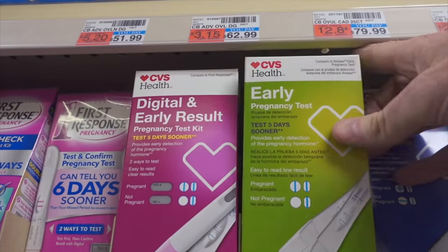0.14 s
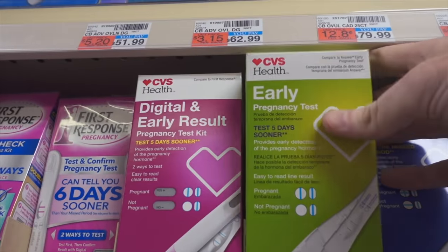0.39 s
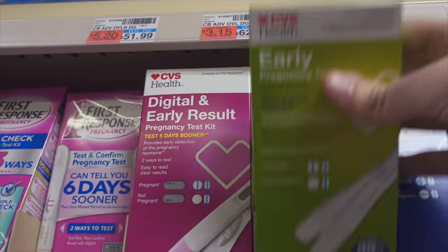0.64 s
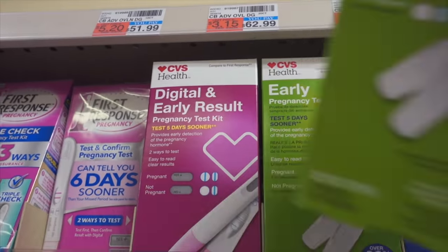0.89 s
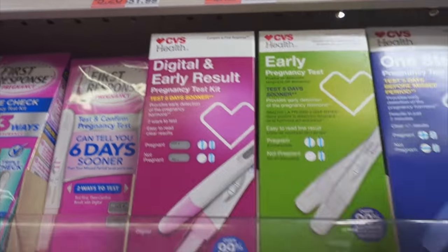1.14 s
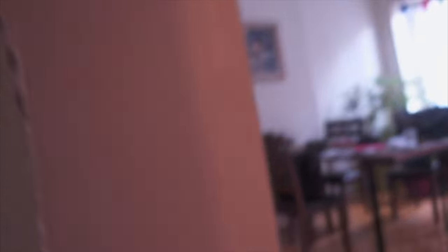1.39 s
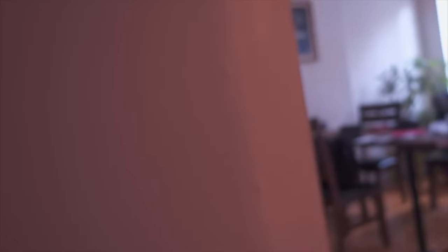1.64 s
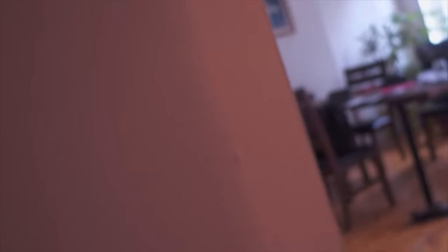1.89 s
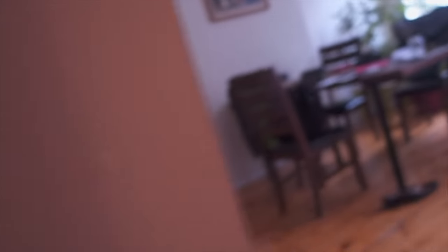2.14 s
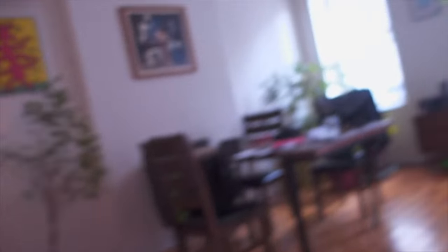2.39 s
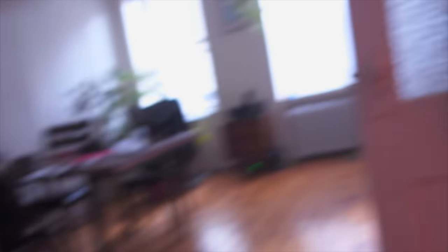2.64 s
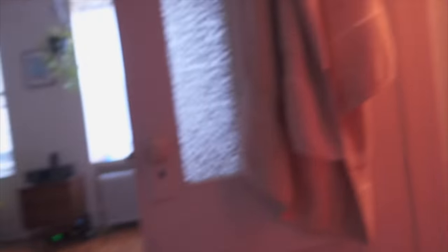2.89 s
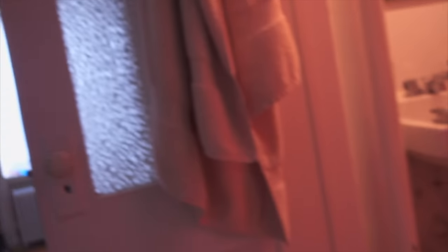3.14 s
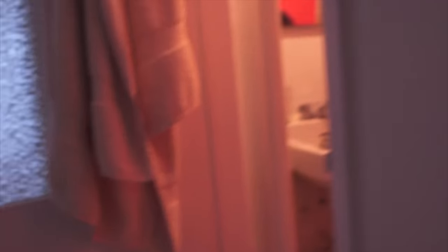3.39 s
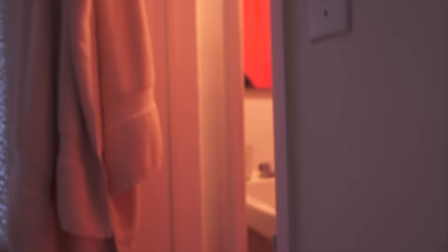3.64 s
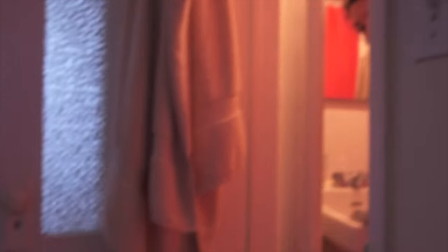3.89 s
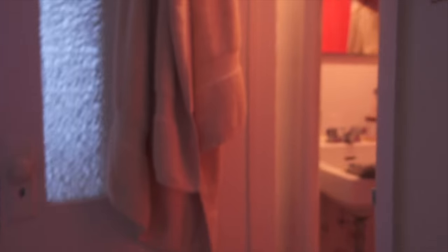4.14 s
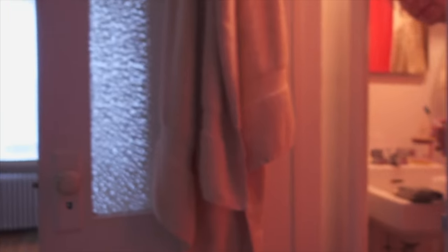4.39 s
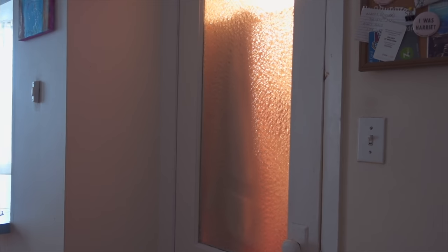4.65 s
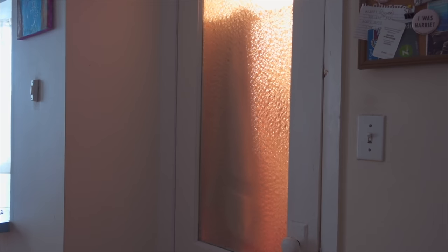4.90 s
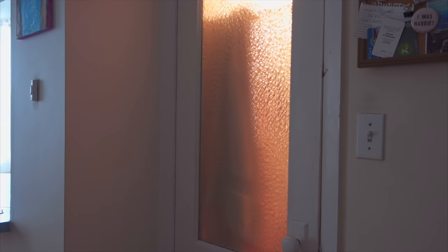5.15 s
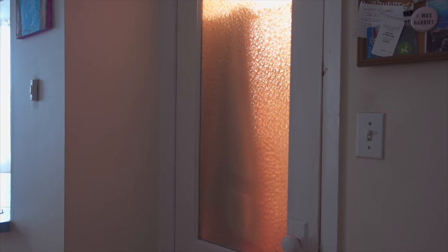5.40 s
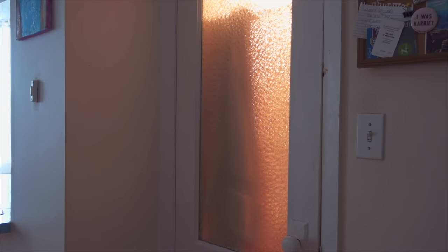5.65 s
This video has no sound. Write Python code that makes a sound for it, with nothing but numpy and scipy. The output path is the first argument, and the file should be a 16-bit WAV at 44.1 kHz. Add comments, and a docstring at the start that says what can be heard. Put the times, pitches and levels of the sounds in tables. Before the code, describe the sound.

In a shop with a low hum, a light cardboard box scrapes along a shelf and knocks hollowly against its neighbours. An abrupt cut to a quiet home: clothes rustle close to the microphone, footfalls thump on wooden boards, small metal parts tick. A latch clacks and jingles, a door thuds shut and shudders in its frame. Finally water hisses steadily through pipes behind the closed door.

```python
"""Three shots, in order of time. In a humming shop a cardboard box is slid off a shelf and knocks its neighbours:
stick-slip noise and struck modes of its panels and the air inside. At home someone walks over a wooden floor:
damped thumps shake the boards, clothes rustle as grainy noise, small metal parts tick. A door latch clacks and
jingles, the door thuds shut and shudders. Behind the closed door water hisses steadily through the pipes,
as smooth and narrow-band noise, with a few faint thumps."""
import sys
import numpy as np
from scipy import signal
from scipy.fft import rfft, irfft, next_fast_len
from scipy.io import wavfile

SR = 44100
rng = np.random.default_rng(int(sys.argv[2]) if len(sys.argv) > 2 else 0)


def bounce(signal):
    """Save signal as a 16-bit WAV file at the path given by the first command-line argument."""
    frames = np.transpose(np.atleast_2d(signal))
    limited = np.clip(frames, -1, 1)
    pcm = np.round(limited * 32767).astype(np.int16)
    wavfile.write(sys.argv[1], SR, pcm)


def attenuation_scalar(level_db):
    """Turn a level in dB into a linear amplitude multiplier (20 dB per decade)."""
    decades = np.asarray(level_db, float) / 20
    return 10 ** decades


N = 254060
T = np.arange(N) / SR
# row gains that tilt a level_db left-right difference evenly
TILT = [.5, -.5]


def rms_one(x):
    """Scales to unit power."""
    return x / np.sqrt(np.mean(x ** 2) + 1e-20)


def at_hz(points, hz):
    """Reads a table on a log-frequency axis."""
    points = np.array(points)
    return np.interp(np.log(hz), np.log(points[:, 0]), points[:, 1])


# Left-right likeness of diffuse sound: pitch_hz, correlation [-1..1]
LIKENESS = [(60, .97), (150, .975), (380, 0.96), (950, 0.86), (2380, 0.63), (5980, -0.15), (15000, -0.2)]


def noise(spectrum=((20, 0), (20000, 0))):
    """Shaped stereo noise of unit power, alike in the bass and nearly unrelated in the treble."""
    size = next_fast_len(N)
    hz = np.arange(1, size // 2 + 2) * SR / size
    mid, side = rfft(rng.standard_normal((2, size)))
    alike = np.clip(at_hz(LIKENESS, hz), -.99, .99)
    pair = np.sqrt(1 + alike) * mid + np.sqrt(1 - alike) * side * [[1], [-1]]
    return rms_one(irfft(pair * attenuation_scalar(at_hz(spectrum, hz)), size)[:, :N])


def grain(per_s, depth_db):
    """Level that jumps about in short lumps; unit power."""
    knots = rng.exponential(1, int(N / SR * 4000))
    lumps = np.interp(T * per_s, np.arange(len(knots)), knots)
    return rms_one(attenuation_scalar(depth_db * np.minimum(lumps, 3)))


def resonate(x, modes):
    """Parallel resonances (pitch_hz, width_hz, level_db) with alternating signs."""
    out = 0
    for k, (hz, width_hz, db) in enumerate(modes):
        r = np.exp(-np.pi * width_hz / SR)
        poles = [1, -2 * r * np.cos(2 * np.pi * hz / SR), r * r]
        out = out + (-1) ** k * attenuation_scalar(db) * signal.lfilter([1 - r * r, 0, r * r - 1], poles, x)
    return out


def shaken(envelope, modes):
    """Noise under an envelope drives a body; the body leaves the power unchanged."""
    impulse = resonate(signal.unit_impulse(8192), modes)
    return resonate(envelope * noise(), modes) / np.sqrt(np.sum(impulse ** 2))


def bursts(times_s, db, t60_s):
    """Envelope of contacts that start at once and die away."""
    out = np.full(N, 1e-9)
    for s, gain, ring_s in zip(times_s, attenuation_scalar(db), np.broadcast_to(t60_s, np.shape(times_s))):
        i = int(s * SR)
        age = T[:min(SR // 2, N - i)]
        out[i:i + len(age)] += gain * attenuation_scalar(-60 * age / ring_s)
    return out


def struck(times_s, db, pitch_hz, t60_s, rise_s):
    """Damped sines, one row per contact; a soft contact makes them swell briefly."""
    out = np.zeros((len(times_s), N))
    age = T[:SR // 2]
    for row, s, gain, hz, ring_s in zip(out, times_s, attenuation_scalar(db), pitch_hz, t60_s):
        i = int(s * SR)
        envelope = gain * attenuation_scalar(-60 * age / ring_s) * (1 - np.exp(-age / rise_s))
        ring = envelope * np.sin(2 * np.pi * hz * age)
        row[i:][:len(age)] = ring[:N - i]
    return out


def swells(rows):
    """Strokes swell and fade at steady dB rates: summed power as gain, last column averaged by power as gain."""
    power = weighted = 1e-12
    for s, db, swell_s, fade_s, other_db in rows:
        fall = np.maximum((s - T) / swell_s, (T - s) / fade_s)
        stroke = attenuation_scalar(2 * (db - 10 * fall))
        power = power + stroke
        weighted = weighted + stroke * attenuation_scalar(2 * other_db)
    return np.sqrt(power), np.sqrt(weighted / power)


def tones(lines, waver_db):
    """Steady tones (pitch_hz, rms level_db) whose strength wavers."""
    return sum(np.sqrt(2) * attenuation_scalar(db) * grain(14, waver_db) * np.sin(2 * np.pi * hz * T) for hz, db in lines)


def room(x, t60_s, wet_db):
    """Adds a diffuse tail; walls and air swallow the treble sooner."""
    age = T[:SR // 2]
    bass = signal.lfilter([.3], [1, -.7], noise()[:, :len(age)])
    bass = signal.lfilter([.5], [1, -.5], bass)
    full = .4 * noise()[:, :len(age)]
    tail = bass * attenuation_scalar(-60 * age / t60_s) + full * attenuation_scalar(-60 * age / (.55 * t60_s))
    tail = tail * (age > .004) / np.sqrt(np.sum(tail ** 2) / 2)
    source = x.mean(axis=0, keepdims=True)
    return x + attenuation_scalar(wet_db) * signal.fftconvolve(source, tail, axes=1)[:, :N]


# Shop hum: pitch_hz, level_db (rms)
SHOP_HUM = [(86, -50), (118.4, -45.5)]
# Shop air spectrum: pitch_hz, density_db_per_hz
SHOP_AIR = [(18, -45.5), (30, -27.5), (106, 4), (179, -11), (554, -12.5), (844, -33), (1010, -23),
            (1630, -22), (1760, -16.5), (4530, -41.5), (16000, -44.5)]


def shop_air():
    """Wavering hum tones over shaped noise."""
    return tones(SHOP_HUM, 2.5) + attenuation_scalar(-46) * noise(SHOP_AIR)


# Home air spectrum: pitch_hz, density_db_per_hz
HOME_AIR = [(50, -45), (85, -4.5), (126, 1), (141, -2.5), (468, -25), (569, -7.5), (1050, -21),
            (1590, -15.5), (1740, -7.5), (2460, -27.5), (8200, -37.5), (14500, -35.5), (15800, -31)]
# Mains tone: pitch_hz, level_db (rms)
MAINS = [(59.2, -68)]


def home_air():
    """Faint shaped noise, stronger at left, and a mains tone."""
    return attenuation_scalar(-63) * attenuation_scalar([[1.5], [-1.5]]) * noise(HOME_AIR) + tones(MAINS, .3)


# Pipe hiss spectrum: pitch_hz, density_db_per_hz
HISS = [(24, -63), (40, -34), (185, -11), (256, -24), (422, -15), (733, -11), (965, 1), (1680, -17.5),
        (2150, -11.5), (2630, -24), (2980, -12.5), (7170, -20), (8130, -9), (10200, -27), (16000, -33.5)]
# Pipe resonances: pitch_hz, width_hz, level_db
PIPES = [(178, 54, -15.5), (568.5, 5.1, 5.5), (729, 26, 4), (947, 20, -12), (1454, 23, -4.5),
         (1960, 32, -5.5), (2170, 94, -12.5), (2770, 420, -13.5), (3540, 29, -9), (4140, 115, -11.5),
         (4820, 47, -7.5), (5340, 123, -14), (6090, 130, -12), (6800, 160, -14), (8030, 350, -10.5)]
# Faint whistles in the flow: pitch_hz, width_hz, level_db
WHISTLES = [(508.5, 11, -4.5), (853, 12, -6), (1076, 12, -2), (1136, 10, -0.5), (1190, 12, 3),
            (1310, 12, -6), (2480, 14, -4), (2850, 14, -3.5)]


def pipes():
    """Smooth hiss plus noise held in many narrow resonances."""
    hiss = attenuation_scalar(-41.5) * noise(HISS)
    resonances = attenuation_scalar(-43) * shaken(0.85, PIPES)
    whistles = attenuation_scalar(-51) * shaken(0.93, WHISTLES)
    return hiss + resonances + whistles


# Clothes swishes: peak_s, level_db, swell_s (per 10 dB), fade_s (per 10 dB), heavy_folds_re_weave_db
SWISHES = [(1.328, -32, .035, .08, -8), (1.468, -25, .12, .011, -7), (1.515, -39, .03, .03, -2),
           (1.65, -36, .2, .025, -7), (1.72, -43, .08, .15, -11), (1.94, -51, .03, .05, -6),
           (2.09, -39, .11, .1, -14), (2.2, -33, .12, .12, -8), (2.33, -45, .04, .03, -8),
           (2.404, -47, .025, .1, -2), (2.46, -47, .03, .1, 2), (2.54, -49, .1, .01, 0),
           (2.634, -44, .1, .07, -28), (2.7, -50, .02, .22, -2), (2.955, -62, .02, .1, 4),
           (3.116, -62, .08, .05, 10), (3.16, -61, .3, .02, -2), (3.5, -76, .04, .02, 12),
           (4.11, -66, .06, .02, 14)]
# Fine weave spectrum: pitch_hz, density_db_per_hz
WEAVE = [(1470, -35), (2500, -2), (4420, 1.5), (8040, -2.5), (9310, -1), (11300, 0.5), (14900, 6),
         (15700, -10)]
# Floor board modes: pitch_hz, width_hz, level_db
BOARDS = [(102, 25, 1.5), (138, 33, -0.5), (215, 30, 2.5), (309, 60, -1), (406, 88, -2), (523, 170, -5),
          (623, 70, -3.5), (761, 150, -14.5)]
CRACKLES_PER_S, CRACKLE_RE_WEAVE_DB = 25.0, 1.5
# board rumble when the clothes are at -40 dB; share of their dB swing it follows
FLOOR_DB, FLOOR_FOLLOWS = -52, .6


def clothes():
    """Cloth swishes in fine grains, lone fibres and seams snap, boards rumble under the moving body."""
    weave, heavy = swells(SWISHES)
    rumble = attenuation_scalar(FLOOR_DB) * (weave / attenuation_scalar(-40)) ** FLOOR_FOLLOWS
    snap_gain = attenuation_scalar(CRACKLE_RE_WEAVE_DB + 4.0 * np.minimum(rng.exponential(1, N), 3))
    snaps = (rng.random(N) < CRACKLES_PER_S / SR) * snap_gain
    snaps = signal.lfilter([1], [1, -attenuation_scalar(-60 / (.008 * SR))], snaps + 1e-18)   # 8 ms t60
    fine = weave * (grain(760, 2.8) + snaps) * noise(WEAVE)
    folds = shaken(weave * heavy * grain(400, 2.2), [(750, 500, -2), (1600, 900, 0), (2600, 900, -10)])
    return fine + folds + shaken(rumble, BOARDS)


# Footfalls: start_s, level_db, thump_hz, thump_t60_s, boards_re_level_db
STEPS = [(1.372, -8, 294, 0.046, -9), (1.384, -1.5, 247, 0.033, -14), (1.397, -12, 212, 0.034, -7.5),
         (1.421, -30, 228, 0.05, 0.5), (1.434, -23, 129, 0.033, -7), (1.398, -20, 105, .08, -14),
         (1.33, -36, 125, .12, -12), (1.625, -31, 140, 0.12, -20), (1.739, -37.5, 87.7, 0.13, -14),
         (1.77, -41, 185, 0.12, -16), (1.964, -20.5, 191, 0.19, -15.5), (2.056, -15, 166, 0.065, -23),
         (2.084, -23, 150, 0.07, -19), (2.12, -35, 190, .25, -5), (2.209, -30, 99, 0.073, -12),
         (2.7, -11.5, 222, 0.065, -14), (2.728, -32, 196, 0.082, -3), (2.76, -33, 223, 0.1, -3),
         (2.81, -41, 175, 0.08, -4), (3.1, -45, 195, 0.08, -5), (4.78, -39, 182.5, 0.2, -8),
         (4.849, -39.5, 163, 0.11, -10), (4.95, -40.5, 191, 0.13, -15)]
# deeper thumps wake the two heavy boards more; at HEAVY_HZ as much as the light ones
HEAVY_HZ, HEAVY_DB_PER_OCTAVE = 140, -26


def footfalls():
    """Each footfall is a damped thump that shakes the boards, with a short slap."""
    s, level_db, pitch_hz, t60_s, boards_db = np.transpose(STEPS)
    boards_db = level_db + boards_db
    thump = struck(s, level_db, pitch_hz, t60_s, 0.0025).sum(axis=0)
    heavy_db = HEAVY_DB_PER_OCTAVE * np.maximum(np.log2(pitch_hz / HEAVY_HZ), -.1)
    boards = shaken(bursts(s, boards_db + heavy_db, 1.4 * t60_s), BOARDS[:2])
    boards += shaken(bursts(s, boards_db, 1.28 * t60_s), BOARDS[2:])
    slap = shaken(bursts(s, boards_db - 15, 0.06), [(1000, 600, 0), (1700, 700, 0)])
    return thump + boards + slap


# Dry ticks of small hard parts: start_s, level_db, centre_hz, snap_re_level_db, left_right_db
TICKS = [(1.4508, -9, 2170, -13, 10), (1.4714, -19, 2020, -11, 8), (1.5242, -15.5, 4230, -4.5, 0.0),
         (1.737, -23, 2250, -5.5, -1), (1.8023, -29.5, 2150, -4, 10), (2.173, -27, 1850, -6, 20),
         (2.4077, -16.5, 5600, -16.5, 13), (2.4538, -25, 1670, -14.5, 14), (2.5064, -17.5, 5260, -12.5, -2),
         (2.615, -3.5, 4740, -16.5, 5.5), (2.978, -37.5, 1940, -6, -3), (3.1009, -35, 1540, -17.5, 12),
         (3.506, -39, 2070, -27, 18), (3.6416, -4, 2500, -20, 10.0), (4.6563, -24, 1800, -21, -5)]


def ticks():
    """A few cycles at the centre pitch plus a bright snap."""
    s, level_db, centre_hz, snap_db, pan_db = np.transpose(TICKS)
    snaps = np.stack([bursts(s, level_db + snap_db + side * pan_db, 0.013) for side in TILT])
    bright = shaken(snaps, [(5100, 4400, -2), (9000, 7400, 0), (14500, 2000, -0.28)])
    cycles = struck(s, level_db - 5, centre_hz, np.full(len(s), .005), 0.00028)
    return bright + attenuation_scalar(np.outer(TILT, pan_db)) @ cycles


# Metal parts set ringing: start_s, pitch_hz, level_db, t60_s, left_right_db
RINGS = [(1.452, 7600, -31, .05, 0), (1.526, 7540, -29, 0.05, 5), (1.737, 12070, -35, 0.12, -4),
         (2.407, 5830, -32, 0.036, -1), (2.615, 7620, -29, 0.06, 10), (2.615, 11550, -31, 0.05, 6),
         (2.615, 5900, -14, 0.007, 4.5), (2.615, 3650, -18, 0.007, 13), (3.828, 14130, -20, .09, -2),
         (3.828, 10720, -32, .09, 0), (3.828, 12110, -33, .09, 0), (3.828, 7510, -39, 0.097, 0),
         (4.266, 10770, -24, .06, 0), (4.46, 4020, -30.5, 0.038, 0)]


def rings():
    """Damped high sines with a fluttering level."""
    s, ring_hz, ring_db, t60_s, pan_db = np.transpose(RINGS)
    flutter = grain(350, 2.5)
    return attenuation_scalar(np.outer(TILT, pan_db)) @ struck(s, ring_db, ring_hz, t60_s, 0.00048) * flutter


# Latch contacts: start_s, level_db, clack_hz, jingle_re_rattle_db
LATCH = [(3.556, -21, 1310, -8.5), (3.599, -28, 1190, 1.5), (3.675, -17.5, 2360, -3),
         (3.697, -22, 1770, -16), (3.724, -27.5, 1040, -13), (3.749, -30, 1260, -6.5),
         (3.825, -20, 1710, -10), (4.129, -19, 1470, -20), (4.135, -24.5, 1120, -18), (4.191, -26, 929, -1),
         (4.264, -22, 2010, 3.5), (4.277, -18, 2130, -23), (4.304, -20.5, 947, -18),
         (4.33, -20.5, 1390, -25), (4.433, -21.5, 700, -22), (4.459, -30, 603, -5)]
# Lock body modes: pitch_hz, width_hz, level_db
LOCK = [(861, 90, -20), (1194, 600, 6), (1376, 180, -12), (1700, 200, 3), (1986, 240, 5), (2200, 350, 4.5)]
# Loose metal modes: pitch_hz, width_hz, level_db
JINGLE = [(3630, 1570, 9.5), (7440, 830, 2.5), (10300, 1900, 4), (13900, 940, 1.5), (16000, 1700, -3.5)]


def latch(again_s, again_db):
    """Contacts clack as damped sines, rattle the lock and jingle; each shudder of the leaf rattles it too."""
    s, level_db, clack_hz, jingle_db = np.transpose(LATCH)
    clack = struck(s, level_db + 5, clack_hz, np.full(len(s), .016), 0.0004).sum(axis=0)
    chatter = grain(400, 3.5)
    loose = bursts(again_s, again_db - 5, .07)
    rattle = shaken((bursts(s, level_db, .1065) + loose) * chatter, LOCK)
    jingling = bursts(s, level_db + jingle_db, .2205) + attenuation_scalar(-12) * loose
    return clack + rattle + shaken(jingling * grain(600, 2.0), JINGLE)


# Door against its frame: start_s, level_db, thud_hz, panel_shake_re_level_db
THUDS = [(3.561, -28.5, 243, -1.5), (3.6, -26.5, 158, -4.5), (3.679, -21.5, 156.6, -2),
         (3.697, -21, 328, -7.5), (3.723, -14, 148.5, -18), (3.83, -33, 152, -10), (3.898, -39, 154, -10),
         (3.98, -43, 150, -8), (4.045, -42, 146, -6), (4.127, -28, 145, -2), (4.134, -20, 470, -25),
         (4.194, -19, 224, -11), (4.23, -20.5, 233, -6), (4.291, -9, 209.3, -9), (4.297, -8.5, 86, -12.5),
         (4.359, -15, 48, -10.5), (4.433, -14, 640, -20), (4.44, -21, 88, -1.5), (4.446, -17, 455, -20)]
# Door leaf modes: pitch_hz, width_hz, level_db
DOOR = [(57.5, 11, -2.5), (88, 12, -1), (151, 10, 5), (214, 13.5, -1), (328, 44, -4.5), (455, 71, -3.5),
        (648, 140, -6)]


def leaf(again_s, again_db):
    """Soft damped thuds, noise shaking the panel, and shudders that strike every leaf mode."""
    s, level_db, thud_hz, shake_db = np.transpose(THUDS)
    t60_s = .16 * np.minimum(1, 220 / thud_hz)
    thud = struck(s, level_db - 3, thud_hz, t60_s, .005).sum(axis=0)
    same = np.ones(len(again_s))
    lucks_db = rng.normal(0, 3, (len(DOOR), len(again_s)))
    for (hz, width_hz, db), luck_db in zip(DOOR, lucks_db):
        mode_db = again_db + .3 * db - 6 + luck_db
        thud += struck(again_s, mode_db, hz * same, 2.2 / width_hz * same, .005).sum(axis=0)
    return thud + shaken(bursts(s, level_db + shake_db, .1088), DOOR)


SHUDDER_S, SHUDDER_GAP_S = 4.323, .025   # nominal first touch, mean gap
SHUDDER_DB, SHUDDER_LOSS_DB = -22, 2.1   # first touch, loss per touch


def door():
    """Latch and leaf; once shut the leaf shudders to rest in ten ever weaker touches."""
    touch = np.arange(10)
    again_s = SHUDDER_S + SHUDDER_GAP_S * (touch + rng.uniform(-.25, .25, len(touch)))
    again_db = SHUDDER_DB - SHUDDER_LOSS_DB * touch
    return latch(again_s, again_db) + leaf(again_s, again_db)


# Box walls flexing: peak_s, level_db, swell_s (per 10 dB), fade_s (per 10 dB), deep_re_upper_modes_db
FLEXES = [(0.004, -45, .02, .04, -3), (0.07, -38, .03, .06, -14), (0.13, -48, .04, .03, 3),
          (0.17, -37, .04, .08, -14), (0.30, -54, .05, .1, 8), (0.42, -50, .05, .15, 13),
          (0.53, -39, .08, .08, -4), (0.62, -44, .03, .03, -6), (0.702, -32, .012, .25, -9),
          (0.826, -29, .03, .015, -3), (0.872, -21, .003, .04, -11), (0.9, -25, .012, .035, 2),
          (1.086, -44, .2, .025, -2), (1.175, -48, .01, .03, 10), (1.225, -45, .03, .04, -8)]
# Air in the box: pitch_hz, width_hz, level_db
HOLLOW = [(255, 36, -8), (439, 66, 9.5), (585, 117, 1.5)]
# Box knocks: start_s, panels_db, thud_re_panels_db, crack_re_panels_db
KNOCKS = [(0.071, -49.5, 16.5, -5.5), (0.109, -32.5, -5.5, -12), (0.214, -31, -21, -16),
          (0.295, -46, -1, 3), (0.531, -33, 3, -20), (0.566, -46, 3, -1), (0.818, -15.5, -4, -24),
          (0.868, -19, -4, -4), (0.8695, -17, 7, -8), (0.879, -26, 5, -8.5), (0.8875, -21, 9, -6),
          (0.895, -23, 3, -14), (0.904, -22, 5, -2), (0.909, -24, 6, 1), (0.922, -30, 10, -5),
          (0.9325, -24, 3, -22), (0.975, -28.5, -12.5, -2.5), (1.064, -33, -20, -12), (1.08, -22, -16, 0.5),
          (0.612, -36, 0, -8), (1.095, -36.5, -9.5, -12), (1.172, -22.5, -12.5, -13),
          (1.219, -25, -10, -20)]
THUD_CYCLES = 9.0   # cycles to fall 60 dB


def box_air():
    """Flexing walls pump the air inside; knocks ring its modes."""
    flex, deep = swells(FLEXES)
    s, panel_db, thud_db, _ = np.transpose(KNOCKS)
    same = np.ones(len(s))
    out = shaken(flex * deep, HOLLOW[:1]) + shaken(flex, HOLLOW[1:])
    lucks_db = rng.normal(0, 2.5, (len(HOLLOW), len(s)))
    for (hz, _, db), luck_db in zip(HOLLOW, lucks_db):
        mode_db = panel_db + thud_db + .2 * db - 1.5 + luck_db
        out += struck(s, mode_db, hz * same, THUD_CYCLES / hz * same, 0.00027).sum(axis=0)
    return out


# Box dragging along the shelf: peak_s, level_db, swell_s (per 10 dB), fade_s (per 10 dB), brightness_db
DRAGS = [(0.05, -60, .05, .1, 2), (0.11, -53, .04, .04, -1), (0.166, -56, .03, .04, 6),
         (0.222, -49, .04, .05, -4), (0.3, -60, .1, .1, 4), (0.375, -50, .015, .25, -6),
         (0.5, -48, .05, .03, 0), (0.575, -46, .03, .05, 3), (0.63, -41, .1, .02, 0),
         (0.70, -35, .025, .2, 2), (0.8, -31, .1, .015, 5), (0.86, -36, .03, .06, 1),
         (0.964, -39, .03, .08, 0), (1.086, -48, .06, .06, -4), (1.15, -51, .04, .15, 4)]
# Cardboard panel modes: pitch_hz, width_hz, level_db
CARD = [(1040, 300, -0.5), (1527, 330, 1), (2205, 330, -7), (3150, 600, -4.5), (4500, 500, -4),
        (6000, 640, -12)]
RUB_RE_SCRAPE_DB, FINGERTIP_RE_SCRAPE_DB = 1.2, -4
RUB_SHARE = -.2   # brightness lifts the fingertip hiss and trades away a little rub


def box_panels():
    """Stick-slip grains shake the panels; knocks click through every panel and crack."""
    scrape, bright = swells(DRAGS)
    s, panel_db, _, crack_db = np.transpose(KNOCKS)
    same = np.ones(len(s))
    out = shaken(scrape * grain(200, 3.5), CARD[:3])
    out += shaken(bursts(s, panel_db - 1.5, 0.038), CARD[:3])
    for hz, width_hz, db in CARD:   # crisp click of the first touch
        out += struck(s, panel_db + db - 1.5, hz * same, 5 / width_hz * same, 0.00025).sum(axis=0)
    rub = attenuation_scalar(RUB_RE_SCRAPE_DB) * scrape * bright ** RUB_SHARE
    fingertip = attenuation_scalar(FINGERTIP_RE_SCRAPE_DB) * scrape * bright
    out += shaken(rub * grain(400, 2.5) + bursts(s, panel_db - 6.5, 0.049), CARD[3:])
    crack = bursts(s, panel_db + crack_db - 2.1, .025)
    return out + shaken(fingertip * grain(400, 2.5) + crack, [(7000, 3100, 1), (14500, 5000, -1)])


SHOP_ENDS_S, HOME_ENDS_S = 1.253, 4.645
SHOP_T60_S, HOME_T60_S = 0.25, 0.77
LEFT_LAG_SAMPLES = 3


def scene():
    """Shop, then home; door and home air fade as the pipes fade in, steps and ticks run on."""
    shop = room(box_air() + box_panels(), SHOP_T60_S, -19) + shop_air()
    fading = np.clip((HOME_ENDS_S + 0.055 - T) / 0.098, 0, 1)
    doorway = (room(door(), HOME_T60_S, -11) + home_air()) * fading
    doorway[0] = np.roll(doorway[0], LEFT_LAG_SAMPLES)   # the door stands nearer the right port
    walking = room(clothes() + footfalls(), HOME_T60_S, -22) * attenuation_scalar([[.5], [-.5]])
    home = walking + room(ticks() + rings(), HOME_T60_S, -17) + doorway
    in_shop = np.clip((SHOP_ENDS_S - T) / 0.0033, 0, 1)
    in_home = np.clip((T - SHOP_ENDS_S) / 0.0088, 0, 1)
    into_last = np.clip((T - HOME_ENDS_S) / 0.066, 0, 1)
    mix = in_shop * shop * attenuation_scalar([[-.1], [.1]]) + in_home * home
    return mix + into_last * pipes() * attenuation_scalar([[.6], [-.6]])


def roll_off(x):
    """The treble ends steeply here."""
    return signal.sosfilt(signal.butter(12, 16990, fs=SR, output="sos"), x)


MICROPHONE_LOW_HZ = 48


def record(dry):
    """The microphone drops the deepest bass, adds its own faint hiss and rounds peaks."""
    low_cut = signal.butter(4, MICROPHONE_LOW_HZ, "high", fs=SR, output="sos")
    heard = signal.sosfilt(low_cut, dry)
    heard += attenuation_scalar(-68) * rng.standard_normal(heard.shape)
    mix = 0.96 * np.tanh(heard / 0.96)
    return roll_off(mix)


dry = scene()
out = record(dry)
bounce(out)
```